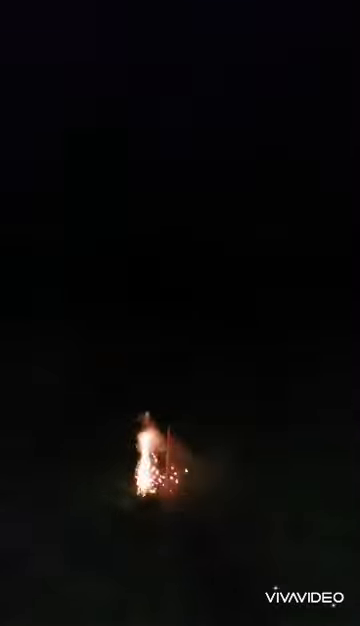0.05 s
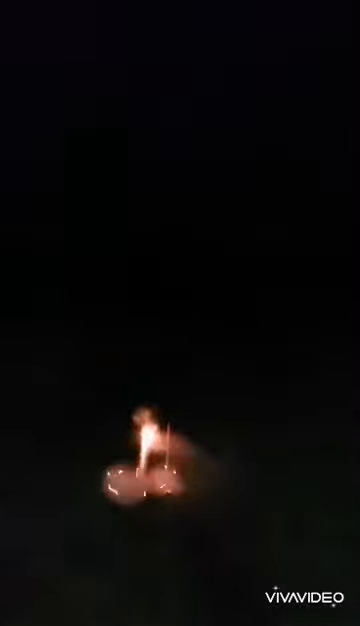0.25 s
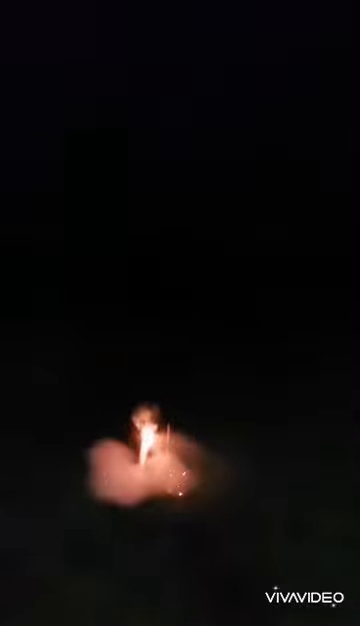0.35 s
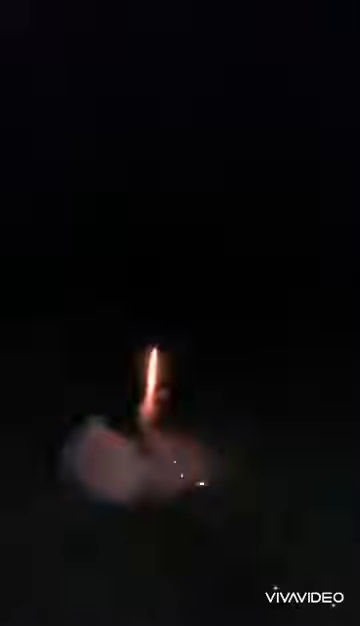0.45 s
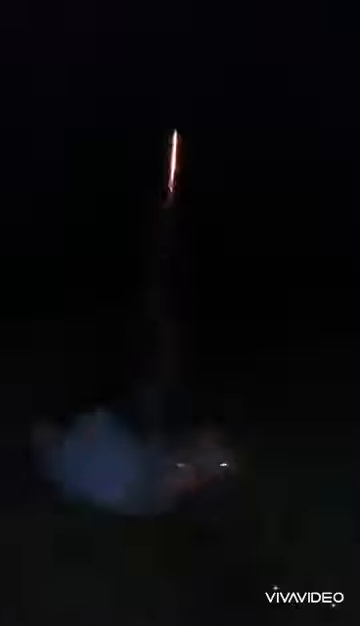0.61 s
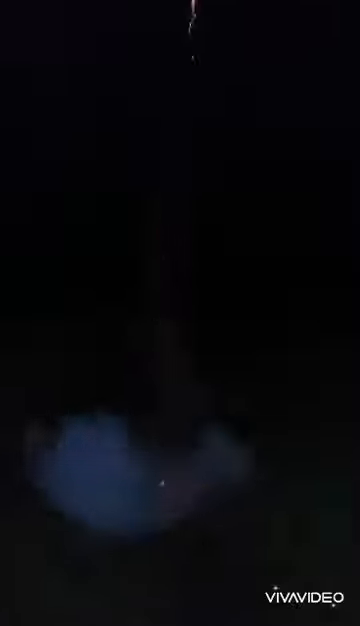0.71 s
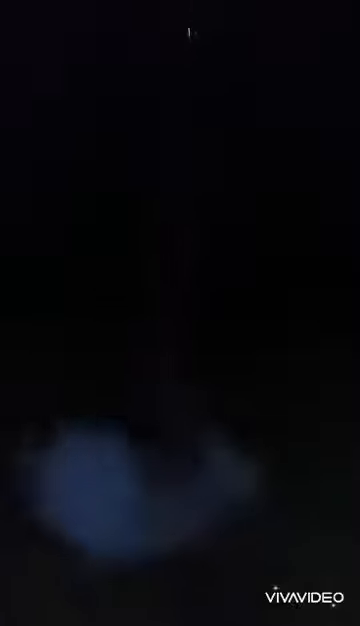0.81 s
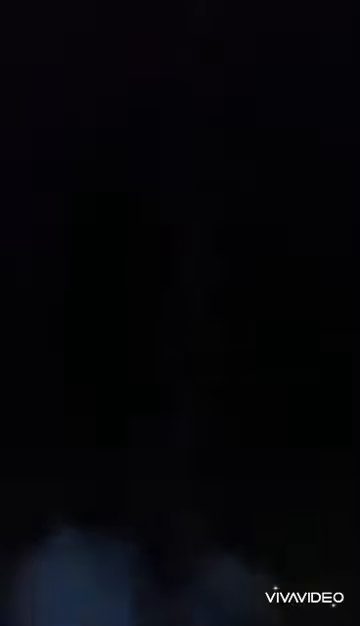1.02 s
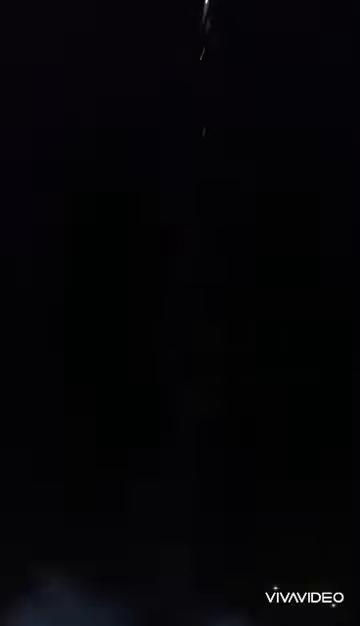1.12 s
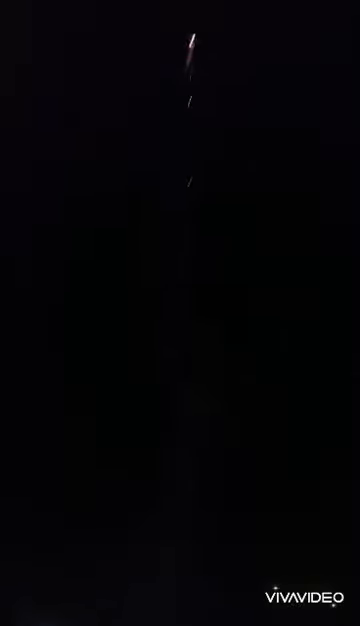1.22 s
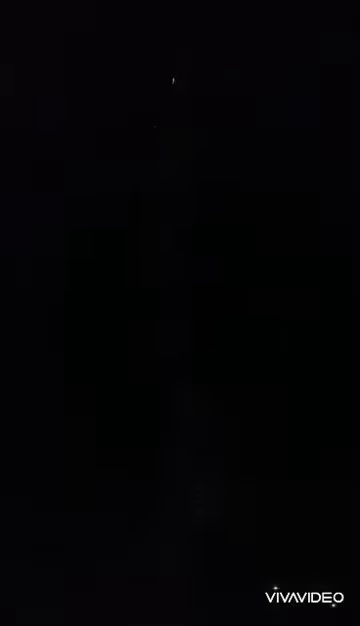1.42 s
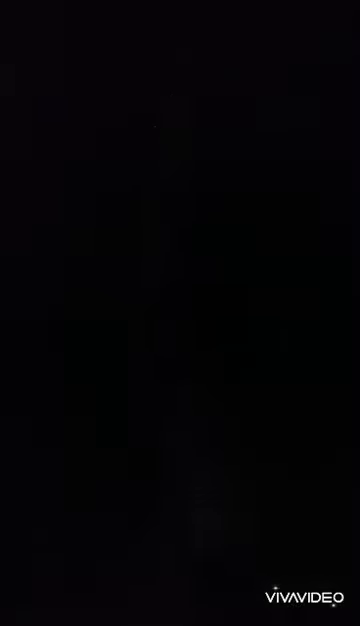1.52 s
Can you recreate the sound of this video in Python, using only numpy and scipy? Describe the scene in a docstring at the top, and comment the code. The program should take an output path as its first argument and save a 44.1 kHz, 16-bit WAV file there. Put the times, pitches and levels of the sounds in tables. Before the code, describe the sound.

A firework rocket on a lawn at night starts almost silent, swells into a loud rushing hiss, buffets the close stereo microphone with low thumps at lift-off, then drops quickly to a faint steady hiss overhead.

```python
"""A firework rocket's jet on a lawn is turbulent broadband noise: it hisses ever louder, lifts off and climbs.
A much fainter hiss follows; noise filters change its colour and a moving delay its lag between two ports.
Faint night air is steady filtered noise beneath the jet.
At lift-off, displaced air strikes the ports as eddies (low noise), puffs (pressure pulses) and a brief whoosh.
"""
import sys
import numpy as np
from scipy import signal
from scipy.fft import rfft, irfft, next_fast_len
from scipy.io import wavfile
from scipy.ndimage import uniform_filter1d, map_coordinates

SR = 44100
rng = np.random.default_rng(int(sys.argv[2]) if len(sys.argv) > 2 else 0)


def bounce(signal):
    """Save signal as a 16-bit WAV file at the path given by the first command-line argument."""
    frames = np.transpose(np.atleast_2d(signal))
    limited = np.clip(frames, -1, 1)
    pcm = np.round(limited * 32767).astype(np.int16)
    wavfile.write(sys.argv[1], SR, pcm)


N = 68355  # samples, about 1.55 s

# overall gain of the jet, before its band gains [t/s, level/dB]
JET_GAIN = [(0, -54), (.045, -53), (.1, -40.5), (.125, -34.5), (.18, -31), (.265, -20.5), (.35, -20.5),
            (.42, -18.5), (.54, -15.5), (.635, -17), (.672, -15), (.73, -22), (.8, -33), (.88, -35.5),
            (1.07, -33.5), (1.26, -36.5), (1.4, -34.5), (1.55, -36.5)]
# gain of the jet's roar, below ROAR_EDGE_HZ, against the hiss [t/s, level/dB]
ROAR_GAIN = [(0, -2.5), (.11, -6), (.2, -0.5), (.3, -1.5), (.42, -1.5), (.54, 2), (.68, 0.5), (.82, -3.5),
             (1.1, -0.5), (1.5, 0.5)]
# gain of the bass, below BASS_EDGE_HZ, against the roar [t/s, level/dB]
BASS_GAIN = [(0, 13.5), (.15, 0.5), (.33, 2), (.47, -1), (.7, 4.5), (.82, 3.5), (.92, -3.5), (1.08, -5.5),
             (1.22, 2), (1.55, -0.5)]
# gain of the treble, above TREBLE_EDGE_HZ: brightest about lift-off, then dulled by distance [t/s, level/dB]
TREBLE_GAIN = [(0, -6.5), (.25, 0.5), (.52, -.5), (.68, 4.5), (.8, 5.5), (1.1, 3), (1.55, -1)]
BASS_EDGE_HZ, ROAR_EDGE_HZ, TREBLE_EDGE_HZ = 540, 3130, 9400

# spectrum of the jet near the ground [f/Hz, left level/dB, right level/dB]
GROUND_COLOUR = [(40, -22, -32.5), (270, -15, -15.5), (486, -23.5, -24.5), (934, -8, -7.5),
                 (1192, -14, -3.5), (1516, -19.5, -16.5), (1774, -6.5, -2.5), (2020, -10.5, -5.5),
                 (2403, -12, -2), (2545, -11, -13.5), (3150, -7.5, -6.5), (3750, -7.5, -14),
                 (4830, -7, -2.5), (5500, -8.5, -16), (5694, -8, 1.5), (5850, -3, -3), (6650, -15, -2),
                 (6840, -3, -2.5), (7650, -13, -13), (9100, -9.5, -10), (11050, -19.5, -2),
                 (11640, -17, -12), (12600, -14, -8), (13500, -17, -11.5), (14700, -18, -11.5)]
# spectrum of the jet overhead [f/Hz, left level/dB, right level/dB]
OVERHEAD_COLOUR = [(40, -39, -31), (131, -19, -23.5), (420, -14, -13.5), (690, -8, -2.5), (1000, -7.5, -8),
                   (1320, -6.5, 1.5), (1930, -6.5, 0), (2410, -3, 1), (2880, -4.5, -6.5),
                   (3260, -6.5, -5.5), (4400, -4, -2), (5150, -3, 0.5), (7140, -4.5, -3.5),
                   (7930, -6.5, -15), (9400, -9, -8), (10400, -12.5, -8), (12400, -13.5, -10.5),
                   (15200, -15.5, -14)]
LIFT_S, LIFT_LENGTH_S = 0.68, 0.25  # middle and time scale of the change from ground to overhead

# delay of the left port behind the right as the rocket climbs [t/s, lag/ms]
PORT_LAG = [(0, 0.031), (.35, .06), (.6, 0.032), (.8, -0.21), (.97, -0.28), (1.15, -0.28), (1.4, -0.21),
            (1.55, -0.23)]
# shared fraction of the noise power at the two ports [f/Hz, fraction/1]
PORT_LIKENESS = [(200, 0.66), (1300, 0.79), (2200, 0.39), (3300, 0.69), (6500, 0.53), (14000, 0.1)]
# phase lead of the left port, due to the body that holds the ports [f/Hz, phase/rad]
PORT_PHASE_LEAD = [(500, -0.6), (1400, 0.66), (2200, 0), (3200, -1.5), (5200, -1.16), (7000, 0.12),
                   (9000, 3), (11000, 3.5)]
# drift of the jet between the ports, left minus right [t/s, level/dB]
PORT_DRIFT = [(0, 0), (.15, 2), (.3, -1.5), (.6, -.5), (.72, 0), (.83, 1.5), (1.05, -.5), (1.55, .5)]

# uneven burning: scale of the random gain, and its random knots per second
FLUTTER_DB, FLUTTER_RATE_HZ, SPUTTER_DB, SPUTTER_RATE_HZ = 0.78, 45, 0.52, 500
PATCHY_DB = 2.02  # rms gain of the swirling patches
WALLS_DB, WALLS_S = -8, 0.03  # combined level and latest delay of the early echoes

# spectrum of the still night air [f/Hz, level/dB]
AIR_COLOUR = [(25, 10.5), (100, -11.5), (500, -18), (4000, -17), (15000, -36)]
AIR_DB = -63

# spectrum of the eddies between the puffs [f/Hz, level/dB]
EDDY_COLOUR = [(20, 6), (80, -24), (250, -19), (700, -38), (3000, -63)]
EDDY_DB, EDDY_PAN_DB = -24, 7  # the pan raises the left and lowers the right
EDDY_S, EDDY_WIDTH_S = 0.655, 0.058  # middle and standard deviation

# puffs of air, before panning and port response
# [t/s, peak level/dB, decay/s, place/1: -1 left, 1 right, beyond these the far port is inverted]
AIR_PUFFS = [(.562, -14.5, .004, 1), (.592, -7, 0.0089, -1), (.613, -10, 0.012, -.98),
             (.666, -10.5, 0.0032, -0.77), (.672, -11, 0.0044, -1), (.677, -3.5, 0.0027, -1.3),
             (.678, -9.5, 0.0042, 0.42), (.715, -19, .003, -0.32), (0.733, -7, 0.0048, -1.05)]
PUFF_RISE_S, PORT_LOW_HZ = 0.00078, 4.7

# spectrum of the whoosh as the rocket passes [f/Hz, level/dB]
WHOOSH_COLOUR = [(100, -22), (450, 0), (1500, -4), (4000, -7.5), (15000, -35)]
WHOOSH_S, WHOOSH_WIDTH_S, WHOOSH_DB = 0.670, 0.0053, -18.5  # middle, standard deviation, level

TOP_HZ = 15600  # band limit


def amp(db):
    """Logarithmic level: 20 dB is a tenfold amplitude."""
    return 10 ** (np.asarray(db) / 20)


def unit(x):
    """Normalisation to unit rms amplitude."""
    return x / np.sqrt(np.mean(x ** 2) + 1e-20)


def along(points, hz):
    """Logarithmic frequency scale: each column of a table is interpolated on it."""
    f, *columns = np.transpose(points)
    return np.array([np.interp(np.log(hz + 1), np.log(f + 1), c) for c in columns])


def seconds():
    """Uniform sampling: the time of every sample."""
    return np.arange(N) / SR


def curve(points):
    """Linear interpolation of a quantity between points in time."""
    return np.interp(seconds(), *np.transpose(points))


def wobble(rate_hz):
    """Band-limited random modulation: a smooth curve through random knots."""
    return map_coordinates(rng.standard_normal(N), [seconds() * rate_hz])


def swell(middle_s, width_s):
    """Gaussian envelope: a bell-shaped rise and fall."""
    return np.exp(-((seconds() - middle_s) / width_s) ** 2 / 2)


def filtered(x, response):
    """Linear filtering: the spectrum times a response of frequency."""
    m = next_fast_len(N + SR // 2)
    hz = np.fft.rfftfreq(m, 1 / SR)
    return irfft(rfft(x, m) * response(hz), m)[..., :N]


def coloured(x, spectrum):
    """Spectral shaping of a signal, normalised to unit rms."""
    return unit(filtered(x, lambda hz: amp(along(spectrum, hz))))


def below(x, edge_hz):
    """Zero-phase low-pass filtering, with half the amplitude at the edge."""
    return filtered(x, lambda hz: 1 / (1 + (hz / edge_hz) ** 6))


def turbulence():
    """Partial coherence: a shared wave with moving lag and phase, plus independent scattered noise."""
    source = rng.standard_normal(N)
    lag = curve(PORT_LAG) * SR / 1000  # in samples
    left_right_times = [np.arange(N) + side * lag / 2 for side in (-1, 1)]
    direct = np.array([map_coordinates(source, [t], order=5, mode="mirror") for t in left_right_times])

    def share(hz):
        """Coherence as a fraction of power."""
        return np.clip(along(PORT_LIKENESS, hz), 0, 1)

    def turn(hz):
        """Interaural-type phase difference, split equally between the ports."""
        return np.exp(np.array([[1j], [-1j]]) * along(PORT_PHASE_LEAD, hz) / 2)

    direct = filtered(direct, lambda hz: np.sqrt(share(hz)) * turn(hz))
    scattered = filtered(rng.standard_normal((2, N)), lambda hz: np.sqrt(1 - share(hz)))
    return direct + scattered


def walls(x, count=10):
    """Early reflection: the surroundings add weak delayed copies, different for each port."""
    echoes = np.zeros((2, SR // 4))
    for port in echoes:
        delays = np.clip(rng.random(count) * WALLS_S, 0, 1 / 5)
        strengths = amp(WALLS_DB) * rng.choice([-1, 1], count) / np.sqrt(count)
        port[(delays * SR).astype(int)] = strengths
    return x + signal.fftconvolve(x, echoes, axes=1)[:, :N]


def swirled(x):
    """Time-frequency modulation: patches of the hiss swell and sink at random, alike in both ports."""
    z = signal.stft(x, nperseg=1024)[2]
    field = rng.standard_normal(z.shape[1:])
    field = uniform_filter1d(field, size=4, axis=0)  # smooth over frequency
    field = uniform_filter1d(field, size=9, axis=1)  # smooth over time
    return signal.istft(z * amp(PATCHY_DB * unit(field)), nperseg=1024)[1][:, :N]


def jet():
    """Jet noise: turbulence, modulated by uneven burning, changes colour at lift-off and dulls with distance."""
    burn_db = FLUTTER_DB * wobble(FLUTTER_RATE_HZ) + SPUTTER_DB * wobble(SPUTTER_RATE_HZ)
    raw = swirled(walls(turbulence() * amp(burn_db)))

    overhead = 0.5 + 0.5 * np.tanh(2 * (seconds() - LIFT_S) / LIFT_LENGTH_S)  # from 0 to 1
    hiss = (1 - overhead) * coloured(raw, GROUND_COLOUR) + overhead * coloured(raw, OVERHEAD_COLOUR)

    bass = below(hiss, BASS_EDGE_HZ)
    lower = below(hiss, ROAR_EDGE_HZ)
    body = below(hiss, TREBLE_EDGE_HZ)
    roar = lower - bass + amp(curve(BASS_GAIN)) * bass
    middle = body - lower
    treble = hiss - body
    balanced = amp(curve(ROAR_GAIN)) * roar + middle + amp(curve(TREBLE_GAIN)) * treble

    drift_db = np.outer([1, -1], curve(PORT_DRIFT)) / 2
    return amp(curve(JET_GAIN) + drift_db) * balanced


def night_air():
    """Stationary random noise: a faint outdoor background, independent at each port."""
    return amp(AIR_DB) * coloured(rng.standard_normal((2, N)), AIR_COLOUR)


def eddies():
    """Turbulent pressure fluctuation: mostly low noise swells about lift-off, stronger at the left."""
    noise = coloured(rng.standard_normal((2, N)), EDDY_COLOUR)
    port_db = EDDY_DB + EDDY_PAN_DB * np.array([[1], [-1]])
    return swell(EDDY_S, EDDY_WIDTH_S) * amp(port_db) * noise


def puffs():
    """Transient pressure: quick-rising pulses of air decay exponentially, pulling and pushing in turn."""
    t, pressure = seconds(), np.zeros((2, N))
    for k, (start_s, peak_db, decay_s, place) in enumerate(AIR_PUFFS):
        age = np.maximum(t - start_s, 0)
        push = (1 - np.exp(-(age / PUFF_RISE_S) ** 2)) * np.exp(-age / decay_s)
        panned = np.outer([1 - place, 1 + place], push / push.max()) / 2
        pressure -= (-1) ** k * amp(peak_db) * panned
    return pressure


def whoosh():
    """Noise burst: a brief throaty swell as the rocket passes."""
    noise = coloured(rng.standard_normal((2, N)), WHOOSH_COLOUR)
    return swell(WHOOSH_S, WHOOSH_WIDTH_S) * amp(WHOOSH_DB) * noise


def blast():
    """First-order high-pass response: the ports pass changes in air pressure but not a steady push."""
    pressure = eddies() + puffs() + whoosh()
    return filtered(pressure, lambda hz: 1j * hz / (PORT_LOW_HZ + 1j * hz))


def scene():
    """Superposition of the jet, the night air and the blast."""
    return jet() + night_air() + blast()


def record(dry):
    """Band limitation: nothing passes at or above the top frequency."""
    return filtered(dry, lambda hz: hz < TOP_HZ)


dry = scene()
out = record(dry)
bounce(out)
```